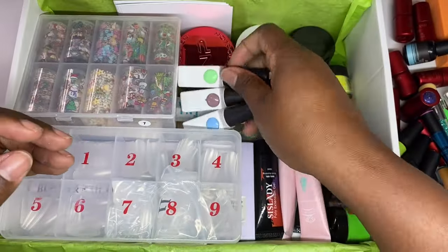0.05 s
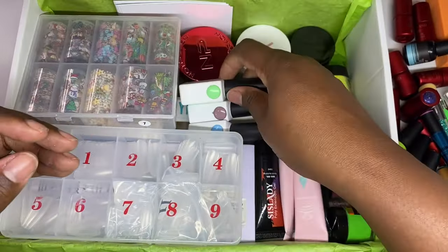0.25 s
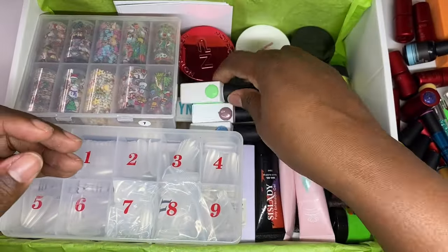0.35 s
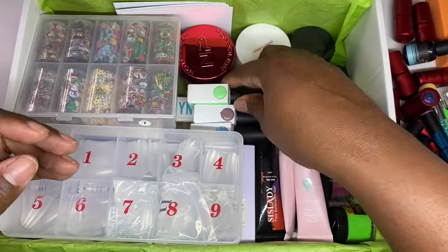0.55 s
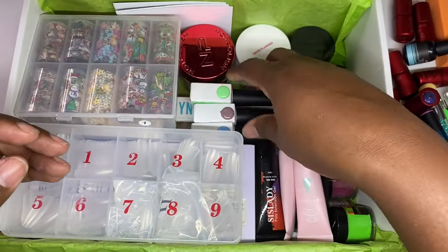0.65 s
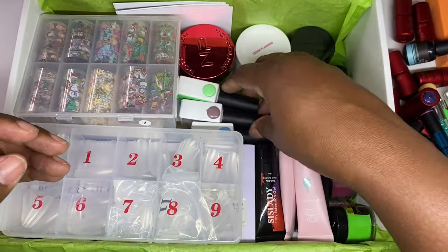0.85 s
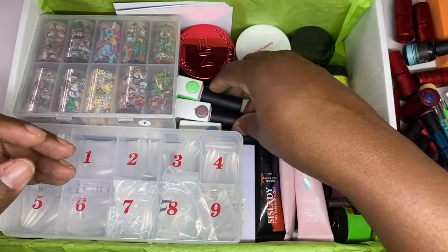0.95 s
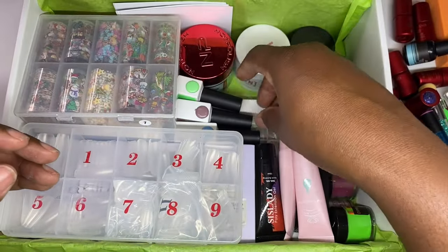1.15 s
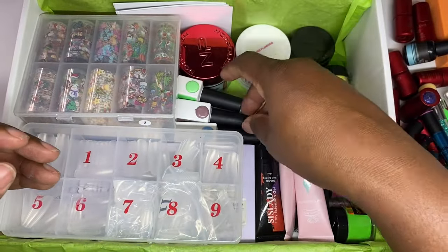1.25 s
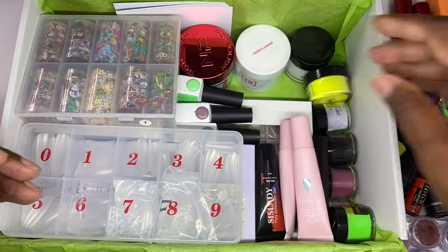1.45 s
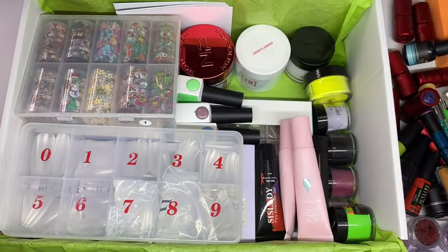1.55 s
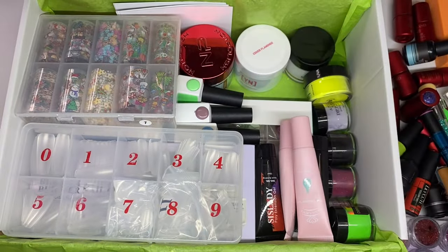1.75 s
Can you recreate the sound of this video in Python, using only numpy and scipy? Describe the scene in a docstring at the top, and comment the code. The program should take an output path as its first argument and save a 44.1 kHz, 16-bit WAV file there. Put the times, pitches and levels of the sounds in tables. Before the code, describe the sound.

Small glass bottles knock and click into a hollow cardboard box, close and in stereo, in a quiet room with low rumble and faint hiss. Firm, short clacks with dull thumps come near 0.2, 0.35, 0.7 and 1.03 seconds, with lighter ticks, tissue rustle and soft dragging between. After 1.3 seconds only tiny contacts and sparse rustling remain, slightly stirring near 1.63.

```python
"""Small glass bottles go into a cardboard box full of jars and tubes in a quiet room, heard close and in stereo.
From the start the room rumbles, hums and hisses: shaped noise. Fingers and bottles rustle on tissue and drag
through the box between the contacts: noise with drawn levels. Contacts crowd the first second or so, strongest near
0.2, 0.35, 0.7 and 1.03 s: falling tones thump the hollow box, noise bursts click on ringing glass, and a
decaying noise tail answers as the room. After about 1.3 s only faint contacts and sparse rustling remain."""
import sys
import numpy as np
from scipy import signal
from scipy.fft import rfft, irfft, next_fast_len
from scipy.io import wavfile
from scipy.ndimage import map_coordinates

SR = 44100
rng = np.random.default_rng(int(sys.argv[2]) if len(sys.argv) > 2 else 0)


def wav_record(signal):
    """Record a signal, one row per channel, as 16-bit PCM in the file named by sys.argv[1]."""
    frames = np.transpose(np.atleast_2d(signal))
    bounded = np.clip(frames, -1, 1)
    # unit amplitude maps onto the largest positive 16-bit level
    quanta = np.round(bounded * 32767).astype(np.int16)
    wavfile.write(sys.argv[1], SR, quanta)


N = 79380  # 1.8 s


def amp(db):
    """Decibels to a factor of amplitude."""
    return 10 ** (np.asarray(db) / 20)


def unit(x):
    """Scales a signal to rms 1."""
    return x / np.sqrt(np.mean(x ** 2) + 1e-20)


def noise(*shape):
    """White noise with a standard deviation of 1."""
    return rng.standard_normal(shape)


def along(points, hz):
    """Reads (Hz, value) points on a log frequency axis."""
    f, value = np.transpose(points)
    return np.interp(np.log(hz + 1), np.log(f + 1), value)


def level_curve(rows):
    """Draws (seconds, dB) points out to one level per sample."""
    s, db = np.transpose(rows)
    return np.interp(np.arange(N) / SR, s, db)


def wobble(rate):
    """A smooth random curve with rate knots a second."""
    knots = noise(int(N * rate / SR) + 4)
    return map_coordinates(knots, [np.arange(N) * rate / SR])


def filtered(x, response):
    """Multiplies the spectrum of x by a complex response of frequency."""
    n = x.shape[-1]
    m = next_fast_len(2 * n)
    return irfft(rfft(x, m) * response(np.fft.rfftfreq(m, 1 / SR)), m)[..., :n]


def peak(f, hz, width):
    """A causal resonance with gain 1 at its centre."""
    return 1j * f * width / (hz * hz - f * f + 1j * f * width)


def coloured(pair, spectrum):
    """Turns two unrelated signals into a partly alike stereo pair of rms 1 with the given spectrum."""
    # Likeness of left and right. Each row: frequency in Hz, correlation from 0 to 1.
    likeness = [(60, 1), (250, 0.82), (700, 0.51), (2000, 0.19), (5000, 0.22), (9000, .92), (15000, .92)]
    guarded = [(spectrum[0][0] * .7, -120)] + list(spectrum)  # silent below the first point

    def mid_side(hz):
        turn = np.arccos(np.clip(along(likeness, hz), -1, 1)) / 2
        return amp(along(guarded, hz)) * [np.cos(turn), np.sin(turn)]

    mid, side = filtered(pair, mid_side)
    return unit(np.array([mid + side, mid - side]))


def tone(hz, t60, t, glide=0):
    """A damped sine that swells over a fraction of a cycle; with glide it starts sharp and falls to hz."""
    attack_cycles, glide_s = 0.54, 0.0017  # low tones swell more slowly
    cycles = hz * (t + glide * glide_s * (1 - np.exp(-t / glide_s)))
    swell = (1 - np.exp(-t * hz / attack_cycles)) ** 2
    return swell * amp(-60 * t / max(t60, .004)) * np.sin(2 * np.pi * cycles)


def sides(pan_db):
    """Left and right gains that differ by pan_db, left over right."""
    return amp([[pan_db / 2], [-pan_db / 2]])


def add(out, s, sound, pan_db):
    """Places a sound at s seconds in the stereo picture."""
    i = round(s * SR)
    out[:, i:i + len(sound)] += sound[:N - i] * sides(pan_db)


def background():
    """The quiet room: low rumble of changing level, a wavering hum of narrow noise, and a faint steady hiss."""
    # Rumble level over time. Each row: time in seconds, level in dB.
    rumble_level = [(0.0, -57.5), (0.25, -50), (0.334, -62), (0.37, -42.5), (0.42, -47), (0.44, -55),
                    (0.706, -47.5), (0.792, -58), (0.996, -57), (1.142, -61), (1.182, -52), (1.4, -64),
                    (1.6, -61.5), (1.8, -66)]
    # Spectrum of the rumble. Each row: frequency in Hz, relative level in dB.
    rumble_shape = [(12, -46), (20, -21.5), (30, -15.5), (43, -4), (64, -1.5), (84, -12), (102, 1),
                    (130, -20), (170, -38.5), (200, -120)]
    # Spectrum of the room's hiss. Each row: frequency in Hz, relative level in dB.
    hiss_shape = [(100, -28.5), (150, -4.5), (200, -0.5), (320, -8.5), (750, -24.5), (2500, -24),
                  (5400, -37.5), (9000, -23), (15000, -41), (16000, -52.5)]
    hum_hz, hum_width_hz, hum_db = 119, 21, -63.5
    hiss_db, pan_db = -75.5, 4
    rumble = amp(level_curve(rumble_level)) * coloured(noise(2, N), rumble_shape)
    hum = amp(hum_db) * unit(filtered(noise(N), lambda f: peak(f, hum_hz, hum_width_hz) ** 2))
    hiss = amp(hiss_db) * coloured(noise(2, N), hiss_shape)
    return sides(pan_db) * (rumble + hum + hiss)


def rustle():
    """Bottles and fingers slide on tissue paper: a fluttering, finely crackling hiss, and a dull drag in the box."""
    # Paper level over time, before flutter and grain. Each row: time in seconds, level in dB.
    paper_level = [(0, -65), (.19, -63), (.3, -58.5), (.44, -64), (.52, -68.5), (.65, -77), (.665, -63),
                   (.8, -71.5), (.82, -57.5), (.95, -59), (1.0, -76.5), (1.15, -82), (1.18, -63),
                   (1.26, -67), (1.3, -75), (1.37, -82), (1.4, -92), (1.6, -77), (1.64, -68.5), (1.67, -79),
                   (1.8, -86.5)]
    # Drag level over time, before flutter. Each row: time in seconds, level in dB.
    drag_level = [(0, -65), (.06, -51.5), (.18, -63.5), (.26, -41.5), (.33, -52), (.44, -51.5),
                  (.55, -57.5), (.65, -57), (.68, -50), (.8, -52), (.83, -46), (.95, -49), (1.02, -59),
                  (1.15, -58), (1.19, -56), (1.29, -58.5), (1.37, -63), (1.41, -85), (1.6, -82.5),
                  (1.64, -66), (1.68, -71), (1.8, -69)]
    # Spectrum of the tissue paper. Each row: frequency in Hz, relative level in dB.
    paper_shape = [(600, -25), (900, -13.5), (2400, -9), (4100, -7.5), (7000, -16.5), (9000, -13),
                   (12000, -20), (15300, -16), (16000, -39)]
    # Spectrum of the drag through the box. Each row: frequency in Hz, relative level in dB.
    drag_shape = [(76, -24.5), (130, -1.5), (267, 5.5), (774, -3.5), (1200, -5), (1630, -12), (2000, -13),
                  (2600, -49), (4400, -120)]
    paper_flutter_db, drag_flutter_db, grain_db = 1.5, 3, 3
    paper_pan_db, drag_pan_db = -2, 0
    flutter = wobble(59.91)  # paper and drag flutter together
    grain = wobble(350)
    paper_db = level_curve(paper_level) + paper_flutter_db * flutter + grain_db * grain
    paper = amp(paper_db) * coloured(noise(2, N), paper_shape)
    drag_db = level_curve(drag_level) + drag_flutter_db * flutter
    drag = amp(drag_db) * coloured(noise(2, N), drag_shape)
    return sides(paper_pan_db) * paper + sides(drag_pan_db) * drag


def room(x):
    """The room's answer: each frequency dies at its own speed; each stretch of time gets a new noise tail."""
    # Decay of the room. Each row: frequency in Hz, time to fall 60 dB in seconds.
    decay = [(200, 0.1), (1000, 0.24), (4000, 0.18), (12000, 0.24)]
    # Width of the tail. Each row: frequency in Hz, side over mid in dB.
    width = [(200, -5), (2000, 1.5), (6000, 2), (10000, -16.5)]
    # The room gives back little of the low thump. Each row: frequency in Hz, gain in dB.
    colour = [(200, -4), (600, 0.5), (1500, 0)]
    delay_s, stretch = .006, SR // 8
    out = np.zeros((2, N + SR))
    for i in range(0, N, stretch):
        hz, t, z = signal.stft(noise(2, SR // 2), SR, nperseg=256)
        fading = z * amp(-60 * t / along(decay, hz)[:, None])
        mid, side = signal.istft(fading, SR, nperseg=256)[1]
        side = filtered(side, lambda f: amp(along(width, f)))
        tail = mid + side * np.array([[1], [-1]])
        wet = signal.fftconvolve(x[:, i:i + stretch], tail / np.linalg.norm(mid), axes=1)
        j = i + round(delay_s * SR)
        out[:, j:j + wet.shape[1]] += wet
    return filtered(out[:, :N], lambda f: amp(along(colour, f)))


def clicks():
    """Hard contacts: bursts of noise, dying fast, that ring the thick glass briefly."""
    # Each row: start in seconds, level in dB, treble and top relative to the plain crack in dB,
    # time to fall 60 dB in seconds, left over right in dB.
    click_rows = [(0.0731, -37.5, -24, -20, 0.0086, -3), (0.1988, -31, 3.5, -3, 0.022, -3.5),
                  (0.2057, -31, -13, -26, 0.019, -24.5), (0.2097, -18.5, -17, -46, 0.022, 5.5),
                  (0.2248, -29.5, -60, -40, 0.041, -10), (0.2773, -35, -45, -35, 0.033, -6.5),
                  (0.2978, -45, -23, -15, 0.019, 9), (0.3243, -49.5, -17, -14, 0.055, 18),
                  (0.3428, -25, -18.5, -52, 0.016, -15), (0.3469, -25, -34, -53, 0.013, 4),
                  (0.386, -31.5, -30, -41, 0.021, 10), (0.3976, -36, -10, -39, 0.017, -13),
                  (0.4331, -45, -23, 6.5, 0.019, 0), (0.4816, -47.5, 5, -23, 0.022, -3),
                  (0.5127, -46.5, -37, -32, 0.022, 3), (0.5223, -49, -27, -31, 0.022, -4),
                  (0.5525, -62, -19, 6.5, 0.023, 0), (0.6612, -49, -9, 0, 0.034, -2),
                  (0.6949, -29.5, -29, -47, 0.021, 0), (0.7, -39.5, -24, -47, 0.03, -29),
                  (0.7212, -45, -38, -31, 0.046, 12), (0.7602, -47, 1.5, -15, 0.1, -1),
                  (0.8124, -54, -4, 5, 0.023, 1), (0.8843, -42, -29, -34, 0.14, -1.5),
                  (0.9254, -32.5, -15, -19, 0.014, -3), (0.9472, -51.5, -17, 12, 0.016, 4),
                  (0.9755, -38, -12, -23, 0.026, 0), (1.024, -25, -10, -24.5, 0.024, -10),
                  (1.028, -35, -17.5, -33.5, 0.053, 8.5), (1.1652, -38, 0.5, -0.5, 0.024, -6),
                  (1.2195, -62, -1, -15, 0.011, -2), (1.2273, -47, 3, 2, 0.013, -5),
                  (1.2355, -43, -9, -21, 0.013, -1), (1.2842, -54, -30, -17.5, 0.039, -3),
                  (1.3057, -35, -29, -32.5, 0.014, -6), (1.355, -56, -37.5, -34.5, 0.095, -1),
                  (1.3894, -71.5, -18, 9.5, 0.025, 0), (1.5394, -66.5, -23, 2.5, 0.026, -3),
                  (1.6232, -65.5, 2.5, -17.5, 0.059, -1.5), (1.6404, -62, -13, -31, 0.027, 0.5),
                  (1.6975, -63, -4, 10.5, 0.016, -3.5), (1.7674, -57.5, 5.5, -9, 0.017, -7)]
    # Resonances of the glass. Each row: frequency in Hz, width in Hz, relative level in dB.
    glass = [(1720, 350, 0), (2500, 350, 0), (3400, 450, -1), (4300, 450, -4), (5300, 500, -6)]
    ring_db, level_scatter_db, pitch_scatter = 2, 1, .05  # pitch varies at random from click to click
    out, t = np.zeros((2, N)), np.arange(SR // 10) / SR
    for s, db, treble_db, top_db, t60, pan_db in click_rows:
        chance = noise(len(glass), 2)
        shape = amp(-60 * t / max(t60, .003)) * (1 - np.exp(-t / 0.0002))
        burst = unit(noise(len(t)) * shape) * np.sqrt(np.mean(shape ** 2))

        def colour(f):
            ring = sum(amp(level + level_scatter_db * a) * peak(f, hz * (1 + pitch_scatter * b), width)
                       for (hz, width, level), (a, b) in zip(glass, chance))
            crack = peak(f, 2290, 3360) ** 2 * (1 + amp(ring_db) * ring)
            treble = amp(treble_db) * peak(f, 6200, 3600) ** 2
            top = amp(top_db) * peak(f, 12500, 7000) ** 2
            return crack + treble + top

        add(out, s, amp(db) * filtered(burst, colour), pan_db)
    return out


def box_ring(box_modes, hz, t):
    """The hollow box rings, most near the low pitch hz of the blow; level and pitch vary from blow to blow."""
    level_scatter_db, pitch_scatter, db_per_octave = 1.5, .012, 2.4
    ring = 0
    for (f, level, t60), (a, b) in zip(box_modes, noise(len(box_modes), 2)):
        db = level + level_scatter_db * a - db_per_octave * abs(np.log2(f / hz))
        ring = ring + amp(db) * tone(f * (1 + pitch_scatter * b), t60, t)
    return ring


def rattle(t):
    """Neighbours in the box shake after each thump: a swelling, dying band of noise."""
    level_db, t60_s, swell_s = -16, 0.061, 0.0027
    shake = unit(filtered(noise(len(t)), lambda f: peak(f, 650, 1000) ** 2))
    return amp(level_db - 60 * t / t60_s) * (1 - np.exp(-t / swell_s)) * shake


def thumps():
    """Each contact is two short falling tones, sets the box ringing and rattles the jars."""
    # Each row: start in seconds, level in dB before the common gain, low pitch in Hz, its time to fall
    # 60 dB in seconds, upper pitch in Hz, upper tone over low in dB, its time to fall 60 dB in seconds,
    # share sent into the box in dB, left over right in dB.
    thump_rows = [(0.038, -49, 460, 0.027, 584, -0.5, 0.091, -25, 1),
                  (0.075, -20, 224, 0.022, 536, -44, 0.0083, -15, 2),
                  (0.205, -21, 586, 0.0065, 764, -1, 0.024, -7, 4.5),
                  (0.208, -4.5, 342, 0.022, 470, -43, 0.0064, -11.5, 3),
                  (0.2158, -17, 206, 0.021, 1150, -10, 0.031, -14, -6),
                  (0.229, -18.5, 344, 0.035, 825, -11.5, 0.057, -11, -2),
                  (0.279, -32, 329, 0.061, 720, 11, 0.0092, -19, 2),
                  (0.343, -15.5, 510, 0.013, 710, -3, 0.0067, -14, -4.5),
                  (0.3452, -7.5, 249, 0.016, 510, -17.5, 0.0086, -33, 1.5),
                  (0.387, -21, 334.4, 0.034, 883, -4, 0.021, -9, -0.5),
                  (0.395, -22, 190.6, 0.039, 463, -30, 0.0085, -4, 1.5),
                  (0.407, -27.5, 187, 0.019, 460, -38, 0.0078, -18, -4),
                  (0.483, -25.5, 213, 0.075, 450, -2, 0.035, -13, 1.5),
                  (0.521, -47, 180, 0.009, 444, 21, 0.0063, -2, -1),
                  (0.552, -30, 225, 0.042, 535, 3.5, 0.029, -3.5, 1),
                  (0.663, -37, 184, 0.084, 940, -1, 0.011, 1, 0.0),
                  (0.6953, -16, 467, 0.019, 820, -19, 0.013, -14, -3.5),
                  (0.6987, -8, 229, 0.025, 510, -25, 0.034, -17, 3),
                  (0.714, -24.5, 233, 0.012, 600, -7, 0.012, -2, -2),
                  (0.725, -28.5, 220, 0.01, 820, -11.5, 0.023, -10.5, 2),
                  (0.762, -36.5, 210, 0.015, 1080, 10, 0.0062, 0.5, 4),
                  (0.812, -37.5, 187, 0.043, 1010, -23, 0.054, -11, 2),
                  (0.885, -30, 280, 0.026, 895, 5, 0.018, -19, -2),
                  (0.925, -37, 245, 0.043, 770, 10, 0.007, -10.5, 5),
                  (0.939, -37.5, 204, 0.024, 1290, 4, 0.0069, -27, -4),
                  (0.9777, -36, 177, 0.0082, 1210, 8.5, 0.0094, -1.5, 1),
                  (1.0253, -25.5, 515, 0.023, 920, 8, 0.005, -14, -6.5),
                  (1.0276, -7, 265.6, 0.02, 860, -4, 0.0066, -15, 2),
                  (1.0544, -18, 270, 0.013, 448, -32, 0.0077, -12, 0),
                  (1.162, -40.5, 263, 0.036, 945, -0.5, 0.028, -12.5, -0.5),
                  (1.1655, -24.5, 314, 0.014, 475, -13, 0.011, -13, 3.5),
                  (1.233, -45.5, 340, 0.018, 430, -14, 0.021, -0.5, -2),
                  (1.306, -35.5, 233.3, 0.021, 1030, 2.5, 0.013, -6, 1),
                  (1.355, -47, 320, 0.02, 562, -17, 0.063, -5, 1),
                  (1.63, -54, 215.5, 0.01, 440, -23.5, 0.022, -3.5, 1.5),
                  (1.766, -51, 236, 0.0097, 1003, 2, 0.019, -29, -5.5)]
    # Resonances of the box. Each row: frequency in Hz, level in dB, time to fall 60 dB in seconds.
    box_modes = [(98.6, -14, 0.14), (190.5, -2, 0.086), (270.6, -9, 0.068), (345, -7, 0.051),
                 (592, -20.5, 0.11), (733, -8, 0.059), (837, -8.5, 0.044), (1146, -8.5, 0.033),
                 (1136, -36, 0.046), (1372, -17.5, 0.073)]
    # bending waves: the high part of a thump arrives first, so its pitch falls
    low_glide, upper_glide = 0.98, 0.078  # extra pitch at the start, as a fraction
    gain_db, box_floor_hz = 4.5, 107.8  # the box radiates little deeper
    out, t = np.zeros((2, N)), np.arange(SR // 4) / SR
    for s, db, hz, t60, upper_hz, upper_db, upper_t60, box_db, pan_db in thump_rows:
        answer = box_ring(box_modes, hz, t) + rattle(t)
        low = tone(hz, t60, t, low_glide)
        upper = amp(upper_db) * tone(upper_hz, upper_t60, t, upper_glide)
        add(out, s, amp(db + gain_db) * (low + upper + amp(box_db) * answer), pan_db)
    return signal.sosfilt(signal.butter(3, box_floor_hz, "high", fs=SR, output="sos"), out)


def scene():
    """The contacts and the room's answer to them, over the rustle and the background."""
    room_db = -9.5
    hits = thumps() + clicks()
    return hits + amp(room_db) * room(hits) + rustle() + background()


def record(dry):
    """Left and right differ in phase by frequency, then a roll-off and band limit."""
    # Each row: frequency in Hz, phase of left ahead of right in radians.
    left_lead = [(0, 0), (1720, -0.2), (3010, -2.2), (3960, -0.2), (6200, -0.8), (6980, 0.0), (8270, 3.0),
                 (9560, 3.6), (10500, 6.2), (11900, 6.4), (12700, 9.3), (14200, 9.5), (15100, 12.4),
                 (16400, 12.6)]
    roll_off_hz, limit_hz = 15700, 16600
    f, lead = np.transpose(left_lead)

    def turned(hz):
        half = np.exp(.5j * np.interp(hz, f, lead))  # each side takes half the phase
        top = (hz < limit_hz) / (1 + (hz / roll_off_hz) ** 40)
        return top * np.array([half, 1 / half])

    return filtered(dry, turned)


dry = scene()
out = record(dry)
wav_record(out)
```